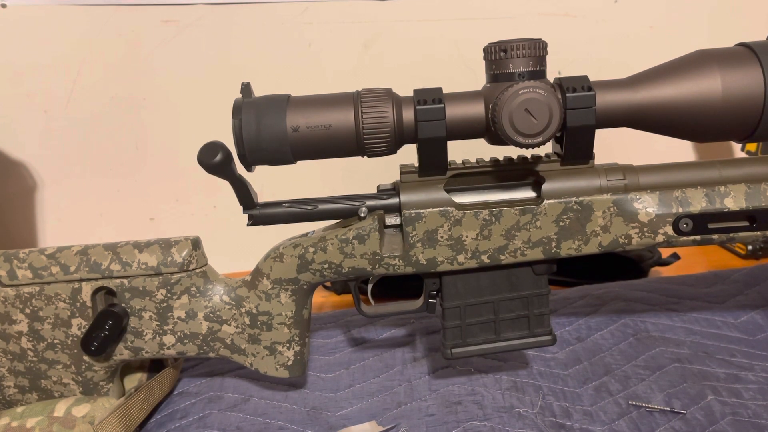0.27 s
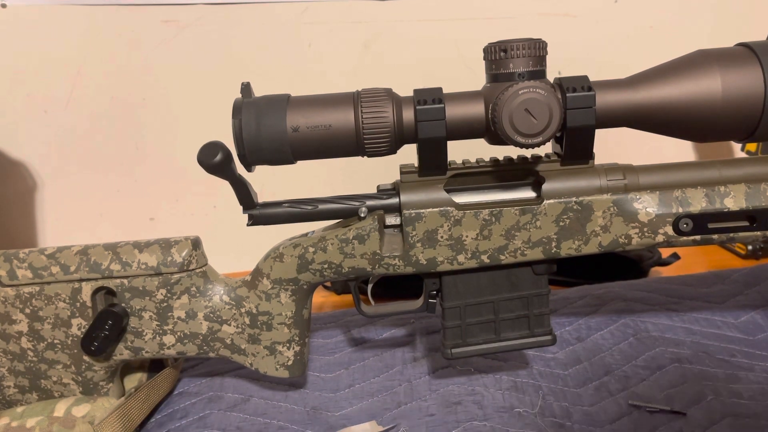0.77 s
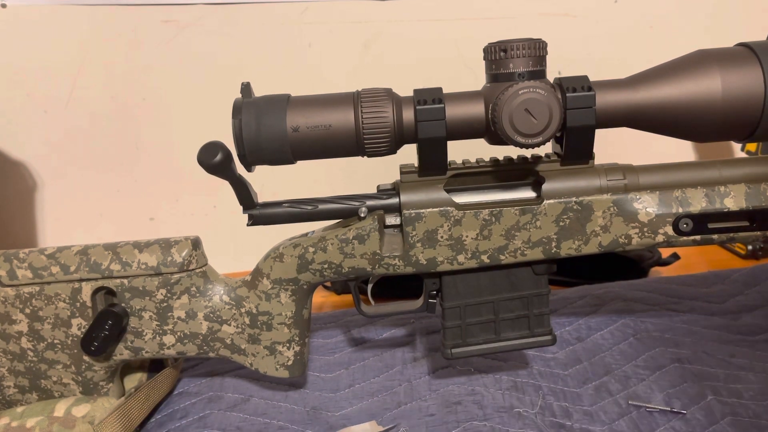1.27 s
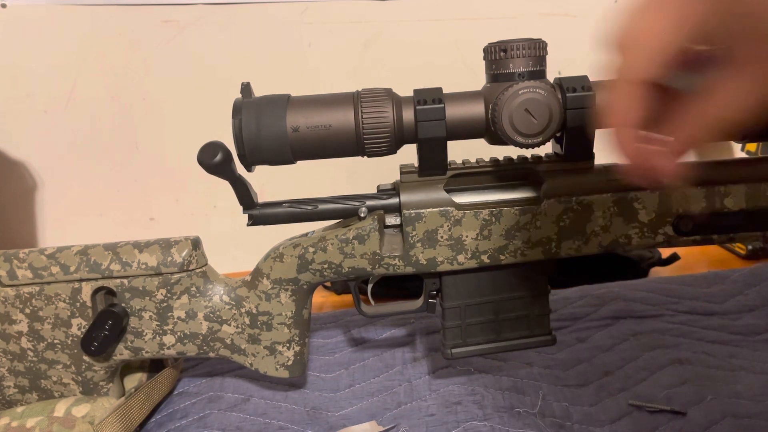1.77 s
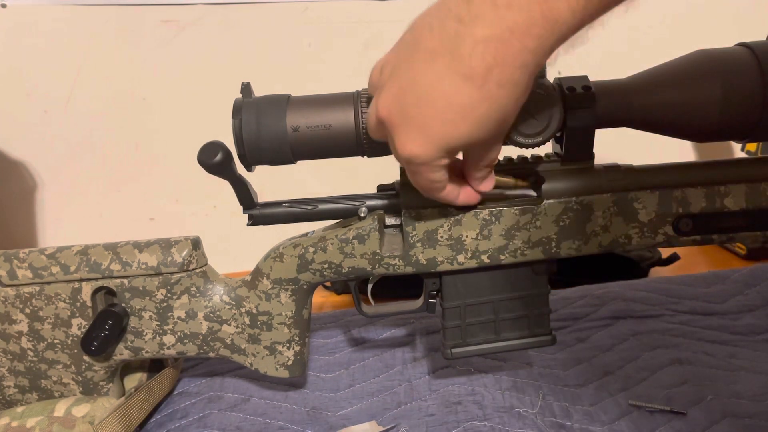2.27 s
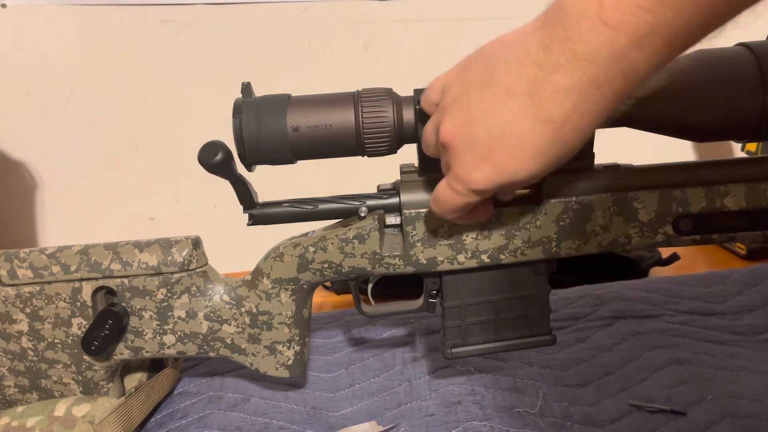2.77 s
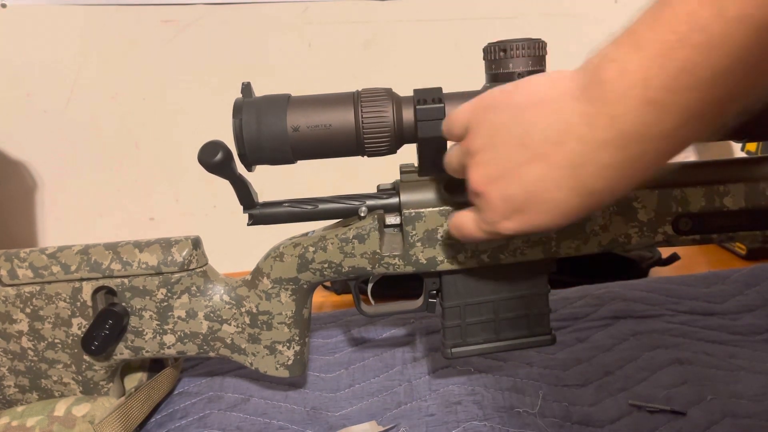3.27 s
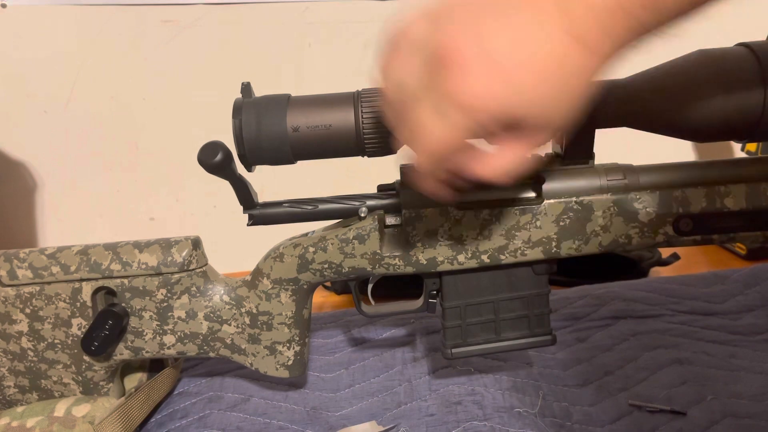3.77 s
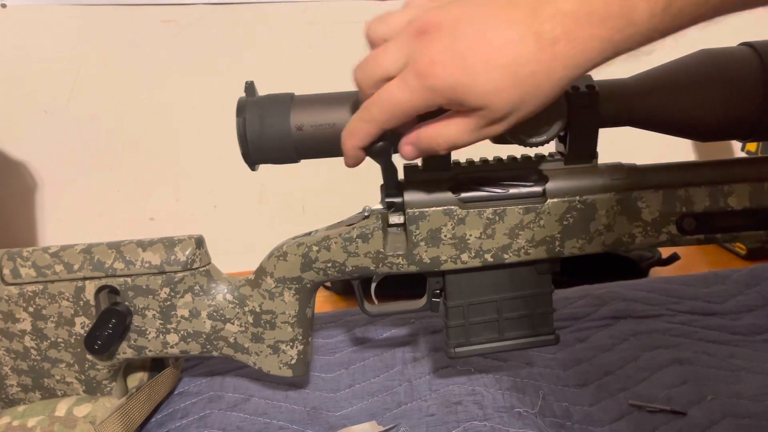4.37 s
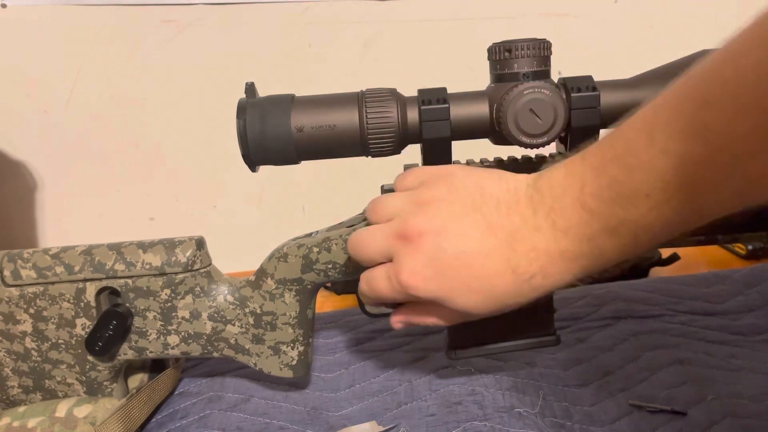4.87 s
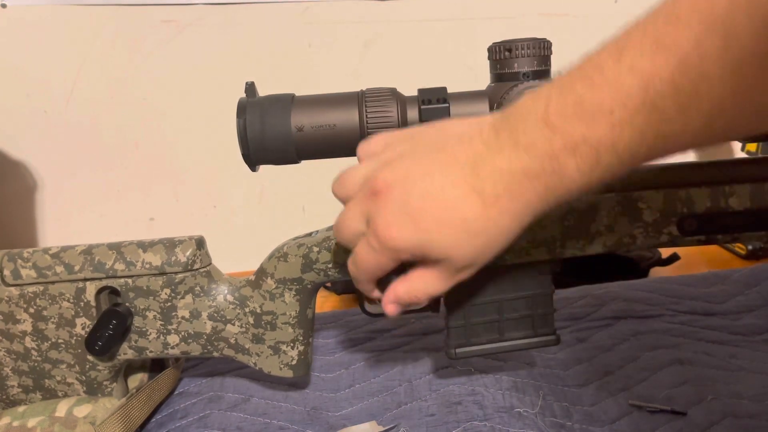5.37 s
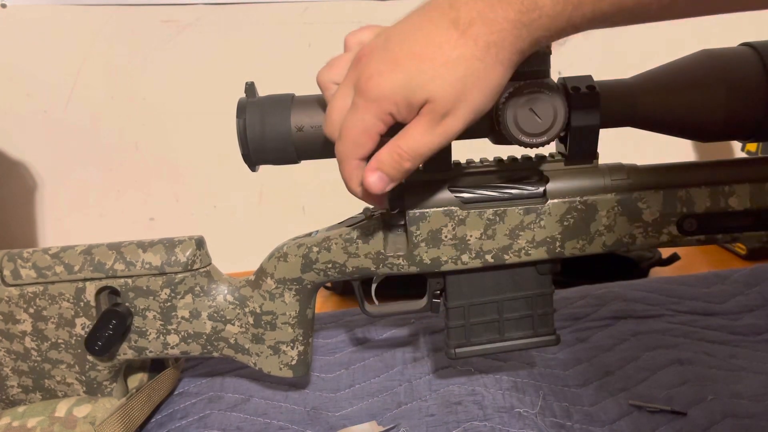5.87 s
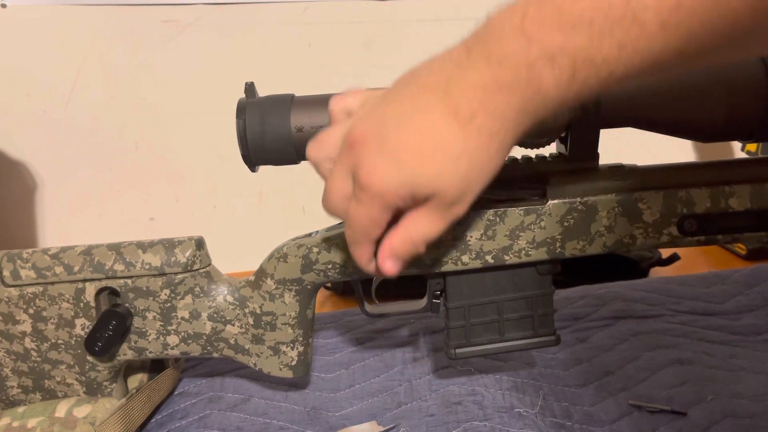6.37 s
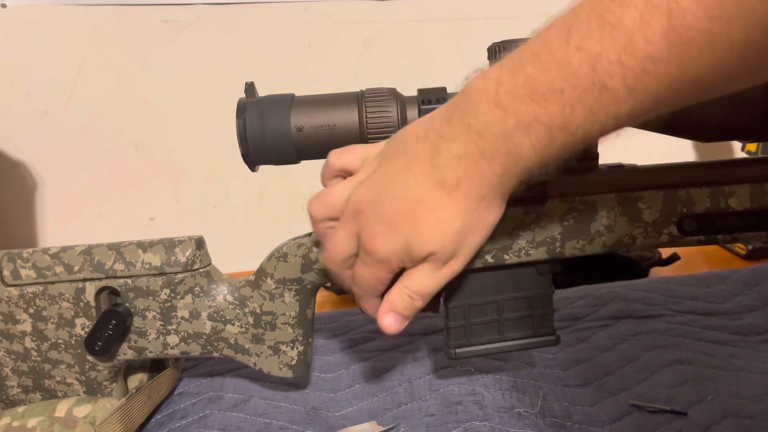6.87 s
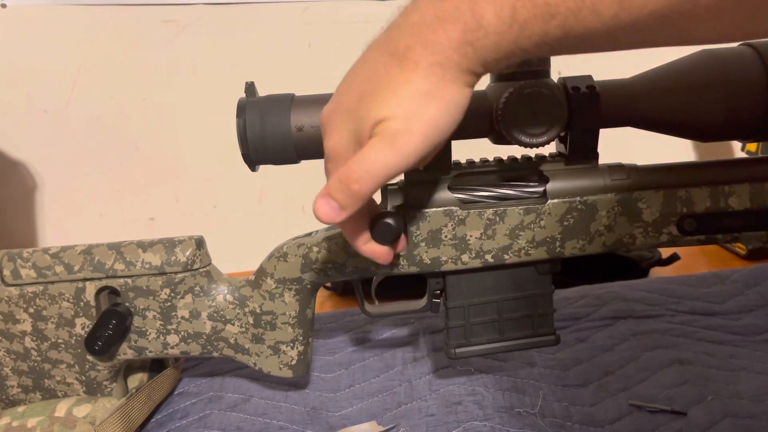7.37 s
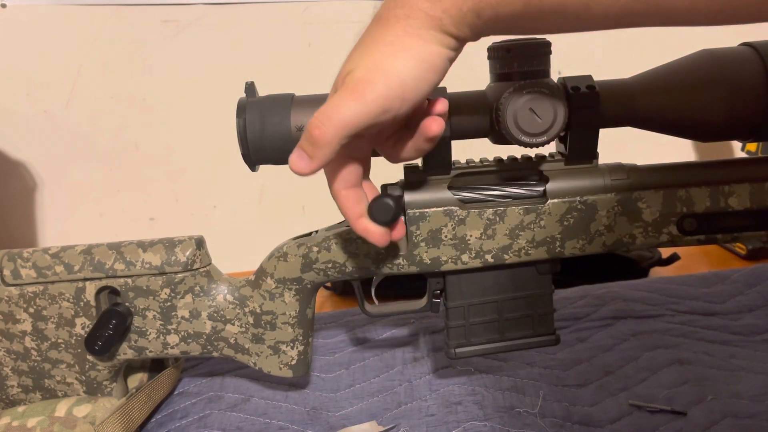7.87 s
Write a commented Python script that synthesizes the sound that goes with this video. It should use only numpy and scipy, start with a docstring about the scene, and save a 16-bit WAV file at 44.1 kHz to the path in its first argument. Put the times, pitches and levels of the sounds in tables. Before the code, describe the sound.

A steady low motor hum with faint beating and soft bassy room air runs throughout, in a small, lightly reverberant room. A bench thump at 0 s is followed by quiet, irregular dull knocks and sleeve rustle until about 1.8 s. A soft brush at 2.15 s leads to a brass cartridge scraping and clinking at 2.3-2.45 s, clicks at 2.74 and 2.94 s, tiny squeaks near 3.05 s, and a firm chambering click with a short grate at 3.55 s. The bolt clacks at 4.12 and 4.2 s, slides, then slams at 4.31-4.33 s, bright, hard and by far loudest, with a short steel ring. Lesser clacks come at 4.6 and 4.86 s. After near quiet, handle clicks occur at 5.73, 6.14-6.23 and, sharper, 6.56 s, with faint ticks at 6.9 and 8.07 s. The microphone is close, in stereo.

```python
"""Bolt-action rifle on a bench

A hand fetches a cartridge, lays it in the port, pushes it into the chamber, runs the bolt home,
turns it down and works the handle again, in a small room over motor hum. Blows are shaped noise
through resonances, with damped sines; slides are tiny catches through modes, squeaks gliding tones.
Hum is sines, air and sleeve are coloured noise. The limiter ducks at the loudest clack.
"""
import sys
import numpy as np
from scipy import signal
from scipy.fft import rfft, irfft, next_fast_len
from scipy.io import wavfile
from scipy.ndimage import uniform_filter1d, minimum_filter1d

SR = 44100
rng = np.random.default_rng(int(sys.argv[2]) if len(sys.argv) > 2 else 0)


def to_wav(sig):
    """Store sig (one row per channel, or 1-D mono) as 16-bit WAV at the path in sys.argv[1].

    Samples outside -1..1 are clipped; the rate is SR.
    """
    pcm = np.clip(np.atleast_2d(sig), -1, 1) * 32767
    pcm = np.round(pcm).astype(np.int16)
    wavfile.write(sys.argv[1], SR, pcm.T)  # frames by channels


N = 357905
TIME = np.arange(N) / SR  # s


def from_db(db):
    """Amplitude ratio of a level in dB."""
    return 10 ** (np.asarray(db) / 20)


def rms_one(x):
    """Scale to rms 1."""
    return x / np.sqrt(np.mean(x ** 2) + 1e-20)


def at_hz(points, hz, axis=1):
    """Read one column of a table on a log-frequency axis."""
    table = np.array(points)
    return np.interp(np.log(hz + 1e-9), np.log(table[:, 0]), table[:, axis])


def band(x, low_hz, high_hz):
    """Band-pass."""
    sos = signal.butter(2, [low_hz, min(high_hz, .45 * SR)], "band", fs=SR, output="sos")
    return signal.sosfilt(sos, x)


def low_pass(x, order, cutoff_hz):
    """Low-pass."""
    return signal.sosfilt(signal.butter(order, cutoff_hz, fs=SR, output="sos"), x)


def add(track, s, sound):
    """Mix a sound into a track from time s."""
    start = max(int(s * SR), 0)
    track[..., start:start + sound.shape[-1]] += sound[..., :N - start]


# Stereo width: f/Hz, side re mid of near sounds/dB, of sounds from all round/dB
WIDTH = [(120, -15.5, -20), (384, -9.5, 1), (1310, -12.5, -2.5), (2474, -5.5, -3), (4600, -6.5, -3.5),
         (8260, -5.5, -1), (11570, -0.5, -3.5)]


def spread(pair, hz, axis=1):
    """Two unrelated signals as mid and side, turned into left and right; side level depends on f."""
    side = from_db(at_hz(WIDTH, hz, axis=axis))
    left, right = pair[0] + side * pair[1], pair[0] - side * pair[1]
    return np.stack([left, right]) / np.sqrt(1 + side ** 2)


def noise(colour):
    """Diffuse stereo noise of a given spectrum, rms 1."""
    hz = np.fft.rfftfreq(N, 1 / SR)
    spectrum = spread(rfft(rng.standard_normal((2, N))), hz, axis=2)
    return rms_one(irfft(spectrum * from_db(at_hz(colour, hz)), N))


def resonate(force, modes):
    """A force rings parallel damped resonances, summed in alternating polarity."""
    out = 0
    for k, (hz, width_hz, db) in enumerate(modes):
        r = np.exp(-np.pi * width_hz / SR)
        zeros = [(1 - r * r) / 2, 0, (r * r - 1) / 2]
        poles = [1, -2 * r * np.cos(2 * np.pi * hz / SR), r * r]
        ringing = signal.lfilter(zeros, poles, force + 1e-18)
        out = out + (-1) ** k * from_db(db) * ringing
    return out


def bells(x, rows):
    """A chain of peaks and notches: (f/Hz, Q, gain/dB)."""
    for hz, q, db in rows:
        w, root = 2 * np.pi * hz / SR, from_db(db / 2)
        centre = np.array([1, -2 * np.cos(w), 1])
        width = np.sin(w) / (2 * q) * np.array([1, 0, -1])
        x = signal.lfilter(centre + width * root, centre + width / root, x)
    return x


def catches(per_s=5000, uneven_db=3):
    """The force of tiny random catches between two sliding surfaces."""
    sizes = (rng.random(N) < per_s / SR) * from_db(uneven_db * rng.standard_normal(N))
    return spread(sizes * rng.standard_normal((2, N)), 3000)


def strokes(rows, range_db=20):
    """Gain of a series of strokes; rise and fall are the times taken over range_db."""
    gain = 0
    for peak_s, db, rise_s, fall_s in rows:
        distance = np.maximum((peak_s - TIME) / rise_s, (TIME - peak_s) / fall_s)
        gain = gain + from_db(db - range_db * distance)
    return gain


def rings(rows, rise_s):
    """Single damped modes (t/s, f/Hz, level/dB, t60/s), mid and side a quarter cycle apart."""
    out, t = np.zeros((2, N)), TIME[:SR // 2]
    for s, hz, db, t60_s in rows:
        phase = 2 * np.pi * hz * t
        envelope = from_db(db - 60 * t / t60_s) * (1 - np.exp(-t / rise_s))
        add(out, s, spread([np.sin(phase), np.cos(phase)], hz) * envelope)
    return out


# Borders of thud, knock, clack and tick: f/Hz
PART_EDGES_HZ = [250, 900, 2500, 7000, 15000]


def blows(rows, modes, parts_db, hit_db, snap_db, snap_s, rise_s, crack_db, rattle_db,
          knock_hz=1500, slope_bend=1.13, spot_q=2.7):
    """Touch, sharp hit and uneven dying chatter; hardness tilts the bands, the spot colours them."""
    columns = np.array(rows).T[..., None]
    times, level_db, slope_db, t60_s, thud_db, spot_hz, spot_db = columns
    t = TIME[:SR // 6]

    wander = signal.resample(rng.standard_normal((len(rows), 48)), len(t), axis=1)
    chatter = from_db(rattle_db * wander) * from_db(-60 * t / t60_s)
    envelope = chatter + from_db(snap_db) * np.exp(-t / snap_s)
    force = rng.standard_normal((2, len(rows), len(t))) * envelope * (1 - np.exp(-t / rise_s))
    force[0, :, int(rise_s * SR)] += from_db(hit_db)
    ringing = resonate(force, modes) + from_db(crack_db) * force

    sounds = 0
    for low, high, part_db in zip(PART_EDGES_HZ, PART_EDGES_HZ[1:], parts_db):
        hz = np.sqrt(low * high)
        octaves = max(np.log2(hz / knock_hz), 0)
        tilt_db = thud_db if high < knock_hz else slope_db * octaves ** slope_bend
        part = band(band(ringing, low, high), low / 2, high * 2)
        part /= part[..., :SR // 100].std(axis=-1, keepdims=True)  # levels refer to the first 10 ms
        sounds = sounds + spread(part, hz) * from_db(level_db + part_db + tilt_db)

    out = np.zeros((2, N))
    for k, s in enumerate(times[:, 0]):
        add(out, s, bells(sounds[:, k], [(spot_hz[k, 0], spot_q, spot_db[k, 0])]))
    return out


# Motor, fan and mains lines: f/Hz, rms level/dB
HUM = [(37.5, -63), (58.42, -58.5), (112.5, -62), (116.83, -43), (120, -60), (233.63, -71), (236.87, -78),
       (584.13, -81)]


def hum():
    """Steady sines; close motor, fan and mains lines beat slowly."""
    out = 0
    for hz, db in HUM:
        out = out + np.sqrt(2) * from_db(db) * np.sin(2 * np.pi * (hz * TIME + rng.random()))
    return out


# Room rumble and hiss: f/Hz, relative level/dB
AIR_COLOUR = [(25, -11), (40, 8.5), (80, 9.5), (120, -2), (200, -.5), (300, -10.5), (500, -16.5),
              (750, -27), (1600, -35), (3000, -36.5), (4500, -47), (11000, -43.5), (15000, -55)]


def air(level_db=-52.5):
    """Steady diffuse noise, strongest in the bass."""
    return from_db(level_db) * noise(AIR_COLOUR)


# Sleeve noise spectrum: f/Hz, relative level/dB
RUSTLE_COLOUR = [(200, -5), (600, 14), (1200, 8), (2500, 7), (5000, 1), (9000, 4), (12000, 0), (15000, -39)]
# Sleeve brushing past: peak t/s, level before sleeve gain/dB, rise/s, fall/s
BRUSHES = [(0, -42.5, .02, 0.055), (.24, -73, 0.055, .2), (.48, -62.5, 0.58, 0.58),
           (.735, -53, 0.064, 0.17), (1.44, -53, 0.57, 0.24), (1.68, -70, 0.11, 0.45),
           (1.8, -50, 0.02, 0.08), (2.15, -46, 0.17, 0.17)]
# Fingers rubbing over bench and cartridge: peak t/s, level/dB, rise/s, fall/s
RUBS = [(.01, -58, 0.022, 0.34), (2.14, -54, 0.12, 0.076), (3.08, -62.5, 0.36, .25),
        (6.52, -67, 0.1, 0.086)]


def hand(sleeve_db=-3.0, rub_low_hz=700, rub_high_hz=2800):
    """The sleeve brushes brightly as coloured noise; the fingers rub dully as filtered catches."""
    sleeve = from_db(sleeve_db) * strokes(BRUSHES) * noise(RUSTLE_COLOUR)
    fingers = strokes(RUBS) * rms_one(band(catches(), rub_low_hz, rub_high_hz))
    return sleeve + fingers


# Things handled further along the bench: t/s, level before layer gain/dB,
# treble slope/dB per bent octave, t60/s, extra thud/dB, spot f/Hz, spot gain/dB
KNOCKS = [(.002, -32, -9.5, 0.23, -10, 1290, -5.5), (.118, -58, -1.5, 0.037, -14, 6600, 17),
          (.241, -41, -5.5, 0.099, -1, 1470, 5), (.268, -55.5, -21, 0.057, 8.5, 800, -7),
          (.571, -51, -6.5, 0.23, 4.5, 920, -9), (.633, -49, -8, 0.11, 2.5, 1110, 12),
          (.668, -57, 1.5, .1, 1, 800, -8), (.745, -45, -0.5, .11, -8.5, 1100, 2),
          (.958, -53.5, -15, .06, -5, 1740, 12), (1.215, -43.5, -8, 0.28, -3, 1370, 2.5),
          (1.317, -50.5, -10, 0.12, 5, 950, 0.5), (1.797, -38.5, -21, 0.043, -3.5, 940, 5.5),
          (1.835, -60, 5, .12, 0, 1100, -7)]
# Bench resonances: f/Hz, width/Hz, level/dB
BENCH = [(590, 82, -20), (796, 99, 6.5), (926, 330, 0), (1410, 280, 5), (1730, 240, -15.5),
         (2830, 1100, -3)]
# Thud, knock, clack, tick of a bench knock: level/dB
BENCH_PARTS_DB = [1.5, -2.5, -2.5, -24]


def bench_knocks(level_db=-10.0):
    """Blows ring the broad resonances of the bench."""
    knocks = blows(KNOCKS, BENCH, BENCH_PARTS_DB, hit_db=20.0, snap_db=8.0, snap_s=0.0013,
                   rise_s=0.00075, crack_db=-3.5, rattle_db=3.0)
    return from_db(level_db) * knocks


# Modes by part: f/Hz, relative level/dB, t60/s
PARTS = {"case": [(1180, -13, .06), (1983, -18, 0.1), (2950, -3.5, 0.031), (5070, -6.5, .025),
         (6490, 11.5, 0.027), (6720, -10, 0.023), (10100, -2, .02)], "feed ramp": [(2025, -14, .05),
         (5260, -9, 0.016), (5360, -15, .025), (5400, -17.5, 0.17), (5600, -16.5, .06), (6820, -17, 0.055),
         (7830, -15, .03)], "magazine": [(365, -11, 0.11), (684, -6.5, 0.075), (1286, 0.5, 0.078),
         (1500, -1, 0.077), (1633, -5, 0.084), (2017, -8.5, 0.22), (2950, -7.5, 0.12), (3160, -8.5, 0.068),
         (4560, -20.5, 0.18), (5320, -16, .03), (6347, -7, 0.046), (7050, -18, .025), (7343, -0.5, 0.028),
         (8070, 3, 0.024), (8220, 1, 0.02)], "chamber": [(1550, -13, 0.043), (2000, -11, .043),
         (2357, -8, .07), (2945, -4.5, 0.049), (3246, 1, 0.03), (4000, -9, 0.077), (4990, -15, .05),
         (7330, 1.5, 0.022), (13000, 0, .04)], "lugs": [(1380, -14, .093), (2834, -13.5, 0.024),
         (3690, 0.5, .017), (3950, -11.5, .04), (6455, -11, .015), (10320, 1, .02), (10630, 1.5, .018),
         (11350, 5, 0.017), (15000, -5.5, .04)], "stock": [(125, 1.5, 0.021), (200.2, -3, .042),
         (263, -9.5, 0.045), (326.2, -6.5, .038)], "bench": [(62.7, 1.5, 0.3), (147, 6.5, 0.065),
         (208.5, -15, 0.92), (288, -7.5, 0.1), (356, -10.5, 0.063), (565, -11, 0.089)]}
# Blows on a part: t/s, level/dB, part
STRIKES = [(.002, -27.5, "bench"), (2.136, -47, "case"), (2.387, -34.5, "case"), (2.398, -36, "case"),
           (2.736, -38, "feed ramp"), (2.745, -31.5, "feed ramp"), (2.935, -30, "magazine"),
           (3.5402, -31.5, "chamber"), (3.558, -28, "chamber"), (4.119, -38.5, "stock"),
           (4.197, -38.5, "stock"), (4.214, -39, "stock"), (4.3073, -4, "lugs"), (4.326, -7, "lugs"),
           (4.33, -10.5, "stock"), (4.586, -21, "lugs"), (4.599, -38, "stock"), (6.626, -36.5, "stock"),
           (6.637, -35.5, "stock")]


def struck_parts(names):
    """Every blow on one of the named parts rings all of that part's modes."""
    rows = []
    for s, db, name in STRIKES:
        if name in names:
            rows += [(s, hz, db + mode_db, t60_s) for hz, mode_db, t60_s in PARTS[name]]
    return rings(rows, rise_s=0.00071)


# Reverberation: f/Hz, level/dB, t60/s
ROOM = [(149.3, -9, 0.55), (498.4, -1.5, 0.65), (1509, -1, 0.62), (3900, 1.5, 0.47), (8100, 2.5, 0.49),
        (12400, -11.5, 0.37)]


def room(x, build_s=0.00082):
    """Dense reflections build up quickly and die away band by band."""
    t, response = TIME[:SR], 0
    edges_hz = np.geomspace(100, 13000, 11)
    for low, high in zip(edges_hz, edges_hz[1:]):
        hz = np.sqrt(low * high)
        decay = from_db(at_hz(ROOM, hz) - 60 * t / at_hz(ROOM, hz, axis=2))
        reflections = band(rng.standard_normal((2, len(t))), low, high)
        response = response + spread(reflections, hz, axis=2) * decay
    response = response * (1 - np.exp(-t / build_s)) / np.sqrt(SR / 20)
    return signal.fftconvolve(x, response, axes=-1)[:, :N]


# Lightly damped modes of barrel and receiver: f/Hz, width/Hz, level before layer gain/dB
STEEL = [(1287, 8, -10.5), (1341, 6, -12), (1653, 9, -8), (2013, 6, -13), (2889, 4.3, -13), (3761, 5, -7.5),
         (3950, 5, -6), (4561, 4.4, -6), (4990, 6, -10), (5443, 5, -11.5), (6867, 5, -5.5), (8970, 5, -5.5),
         (9557, 5, -3), (10788, 6, -1.5), (10995, 6, -3.5), (11402, 6, -4), (11640, 7, -5.5)]


def barrel_ring(action, level_db=-3.5):
    """The action drives narrow modes of barrel and receiver."""
    return from_db(level_db) * resonate(action, STEEL)


# Steel contacts of cartridge and bolt, harder = more treble: t/s, level before layer gain/dB,
# treble slope/dB per bent octave, t60/s, extra thud/dB, spot f/Hz, spot gain/dB
CONTACTS = [(2.308, -60, 5, .016, -3.5, 6500, 3), (2.3865, -56, 4, 0.031, 3, 9700, 2),
            (2.398, -44.5, 3, 0.031, -1, 9600, 3), (2.404, -42.5, -2, 0.088, -2, 2920, 10),
            (2.441, -50.5, -8, 0.081, 9.5, 1350, 4), (2.6, -71, -18, 0.046, -6, 1460, 11),
            (2.638, -70, -23, 0.034, -3, 1410, 11), (2.736, -51, 1, 0.01, 4, 7600, -6),
            (2.743, -54, 0.5, 0.076, -2, 5300, 12.5), (2.934, -37, 0, 0.076, 1.5, 1370, 7),
            (2.941, -30.5, -9.5, 0.039, 4.5, 1670, -4), (3.06, -73, 6.5, 0.034, -1.5, 8500, 10),
            (3.177, -63, -4, 0.034, -7, 4560, 6), (3.186, -68, -20, .033, -4, 1520, -5),
            (3.289, -52, 0.5, .06, 3.5, 4060, 1), (3.541, -46.5, -9, 0.017, 4.5, 3220, 4),
            (3.551, -31.5, -0.5, 0.05, 0.5, 3200, 5.5), (3.557, -33, 0, .057, 2, 4900, 3),
            (3.565, -34.5, -1.5, 0.13, 0, 2430, 4.5), (4.106, -47.5, -10.5, .057, -2, 3000, 2.5),
            (4.118, -29, -2, .029, 6.5, 8700, 12.5), (4.125, -33.5, -1, .03, 2, 1580, 8.5),
            (4.1955, -25.5, -3, .053, -2.5, 9000, 8.5), (4.213, -25.5, -2.5, .035, 3.5, 5400, 5.5),
            (4.3074, -10.5, 4.5, 0.042, -4, 3750, 5), (4.327, -7.5, 2.5, .02, -2, 10960, 9),
            (4.3305, -12.5, 3, .043, -1, 2946, 4.5), (4.3395, -21.5, -3.5, .03, 0, 1313, 1),
            (4.555, -43.5, -3.5, .04, 8.5, 800, 4), (4.5857, -29, 3.5, 0.063, 3.5, 5400, 4.5),
            (4.599, -24.5, -7.5, 0.023, 2, 4396, 15), (4.604, -33, -6.5, 0.04, 5.5, 340, 11.5),
            (4.8572, -36, -10.5, 0.017, -2.5, 1950, -1), (5.266, -64, -13.5, 0.044, 2.5, 1568, 0.5),
            (5.732, -44.5, -8.5, 0.078, 6, 3700, 7), (6.1425, -42, -9, 0.027, -3, 4020, 17),
            (6.153, -45, -13, 0.056, 1, 1700, -5), (6.1875, -40.5, -9, .036, 6, 3980, 15),
            (6.215, -41.5, -3, 0.05, 2.5, 1550, 5), (6.234, -30.5, -2, 0.028, 0, 3180, 6.5),
            (6.5555, -26, -3, 0.052, 1, 8520, 3.5), (6.757, -62, -3, 0.037, 4, 943, 2.5),
            (6.897, -55.5, -4, 0.16, 8, 1500, -2.5), (8.066, -57, -14.5, .033, 11.5, 2680, 0)]
# Thud, knock, clack, tick of a steel contact: level/dB
STEEL_PARTS_DB = [-9, 1, 2, -1]
# Rifle resonances, also used by rifle_body: f/Hz, width/Hz, level/dB
RIFLE = [(365, 34, -14.5), (693, 64, -0.5), (960, 220, -7.5), (1300, 62, -0.5), (1450, 110, 1),
         (1620, 130, 2.5), (2003, 180, -3.5), (2350, 240, -1.5), (2950, 240, -7), (3250, 170, -5),
         (3875, 380, -9), (4560, 160, -6), (4880, 440, -12.5), (5600, 240, -5.5), (6030, 98, -8.5),
         (6803, 270, -4), (7590, 300, -8), (8100, 700, -2), (9490, 370, -2.5), (10300, 420, -3),
         (11250, 510, -2)]


def steel_contacts(level_db=-5.0):
    """Blows of cartridge and bolt ring the rifle's resonances."""
    contacts = blows(CONTACTS, RIFLE, STEEL_PARTS_DB, hit_db=15.5, snap_db=7, snap_s=0.00093,
                     rise_s=0.0007, crack_db=-13.5, rattle_db=4.0)
    return from_db(level_db) * contacts


def rifle_body(force, crack_db=-11):
    """The rifle rings; a share of the force is heard directly as a crack."""
    return resonate(force, RIFLE) + from_db(crack_db) * force


# Brass case modes: f/Hz, width/Hz, level/dB
CASE = [(1146, 160, -5), (2100, 120, -2.5), (2900, 130, -0.5), (4400, 1300, -16), (6300, 82, 0.5),
        (8600, 1200, -15), (11400, 300, -22)]
# Case dragged into the port: peak t/s, level/dB, rise/s, fall/s
DRAGS = [(2.318, -48.5, 0.014, 0.096), (2.385, -46.5, 0.052, 0.039)]
# Case and bolt sliding in the receiver: peak t/s, level/dB, rise/s, fall/s
SLIDES = [(3.06, -54, 0.0076, 0.021), (3.558, -35, .02, 0.022), (3.66, -64.5, .05, 0.07),
          (3.89, -68.5, 0.27, 0.11), (4.145, -53.5, .02, 0.46), (4.298, -43.5, 0.09, 0.011)]


def sliding():
    """Friction sings in the loose case and grates in the receiver."""
    singing = rms_one(resonate(catches(per_s=900, uneven_db=6.0), CASE))
    grating = rms_one(band(rifle_body(catches(per_s=2600, uneven_db=3.0)), 800, 10000))
    return singing * strokes(DRAGS) + grating * strokes(SLIDES)


# Brass squeaking on steel: start t/s, length/s, first f/Hz, last f/Hz, level/dB
SQUEAKS = [(2.423, 0.036, 1200, 1430, -46), (3.018, 0.063, 1214, 915, -56.5),
           (3.062, 0.061, 1006, 1100, -54.5)]


def squeaks(width_hz=90):
    """Unsteady stick and slip: a narrow band that swells, glides with the pressure and fades."""
    waver = rms_one(low_pass(rng.standard_normal((2, N)), 2, width_hz))
    tone = np.zeros(N)
    for s, length_s, first_hz, last_hz, db in SQUEAKS:
        hz = np.linspace(first_hz, last_hz, int(length_s * SR))
        glide = np.sqrt(2) * np.sin(2 * np.pi * np.cumsum(hz) / SR)
        add(tone, s, from_db(db) * np.hanning(len(hz)) * glide)
    return spread(waver, 1560) * tone


# Bolt body, pitch shifting with the grip: t/s, f/Hz, level/dB
PINGS = [(3.187, 1474, -49), (3.231, 1440, -47.5), (3.289, 1402, -39), (4.119, 1410, -30),
         (4.196, 1380, -24), (4.213, 1390, -23), (4.8582, 1560, -35), (5.268, 1450, -49.5),
         (6.144, 1560, -36.5), (6.189, 1450, -32), (6.234, 1536, -37), (6.556, 1390, -27),
         (6.897, 1447, -41.5), (8.065, 1592, -46.5)]


def pings(t60_s=0.025, upper_ratio=1.11, upper_db=-5):
    """The bolt body rings briefly in two close modes, damped by the hand."""
    rows = []
    for s, hz, db in PINGS:
        rows += [(s, hz, db, t60_s), (s, hz * upper_ratio, db + upper_db, t60_s)]
    return rings(rows, rise_s=0.0008)


# Near-sound colour: f/Hz, Q, gain on the left and cut on the right/dB
NEAR_BALANCE = [(330, 1, -1.2), (1200, 0.97, -.9), (4500, 1.2, .9)]


def from_the_left(x, lag_s=.000021):
    """The right microphone hears a near sound a moment later and in another colour."""
    size = next_fast_len(N)
    late = np.exp(-2j * np.pi * np.fft.rfftfreq(size, 1 / SR) * lag_s)
    right = irfft(rfft(x[1], size) * late, size)[:N]
    right_balance = [(hz, q, -db) for hz, q, db in NEAR_BALANCE]
    return np.stack([bells(x[0], NEAR_BALANCE), bells(right, right_balance)])


def scene():
    """The action and its ringing barrel close by, bench knocks, the hand, the hum and the room."""
    background = (hum() + air()) * from_db([[-1.1], [1.1]])  # left, right
    bench = bench_knocks() + struck_parts(["bench"])
    rifle_parts = struck_parts(["case", "feed ramp", "magazine", "chamber", "lugs", "stock"])
    action = rifle_parts + steel_contacts() + sliding() + squeaks() + pings()
    near = from_the_left(action + barrel_ring(action))
    reflections = room(from_db(-8.5) * action + from_db(3) * bench)
    return background + hand() + bench + near + reflections


# Treble peaks and dips of mid: f/Hz, Q, gain/dB
MID_COLOUR = [(10150, 13, -18.5), (13100, 6.9, -9)]
# Treble peaks and dips of side: f/Hz, Q, gain/dB
SIDE_COLOUR = [(8626, 12, -18.5), (10700, 11, 9), (12100, 9.2, -19)]


def treble_colour(x, top_hz=12300, leak_db=-20):
    """Narrow peaks and dips in the treble of mid and side; the sound is dull above top_hz."""
    mid = bells((x[0] + x[1]) / 2, MID_COLOUR)
    side = bells((x[0] - x[1]) / 2, SIDE_COLOUR)
    x = np.stack([mid + side, mid - side])
    return low_pass(x, 12, top_hz) + from_db(leak_db) * x


def limiter(x, ceiling_db=0.5, hold_s=0.11, release_db_per_s=65):
    """The gain drops just ahead of a peak, holds and creeps back."""
    peak_db = 20 * np.log10(np.abs(x).max(axis=0) + 1e-9)
    over_db = np.maximum(peak_db - ceiling_db, 0)
    half = int(hold_s * SR / 2)
    over_db = -minimum_filter1d(-over_db, size=2 * half + 1, origin=half)  # hold
    release_db = release_db_per_s * TIME
    held_db = np.maximum.accumulate(over_db + release_db) - release_db
    lowest_db = minimum_filter1d(-held_db, size=129)  # look ahead
    return x * from_db(uniform_filter1d(lowest_db, size=129))


def record(dry):
    """Treble colour, limiter, and the top cut off."""
    top_cut = signal.cheby2(12, 70, 16600, fs=SR, output="sos")  # 70 dB down from 16.6 kHz
    return signal.sosfilt(top_cut, limiter(treble_colour(dry)))


dry = scene()
out = record(dry)
to_wav(out)
```